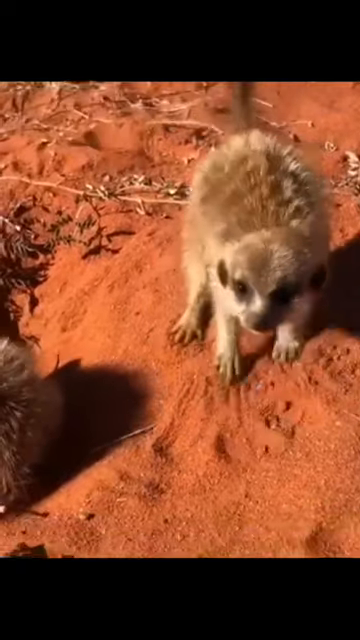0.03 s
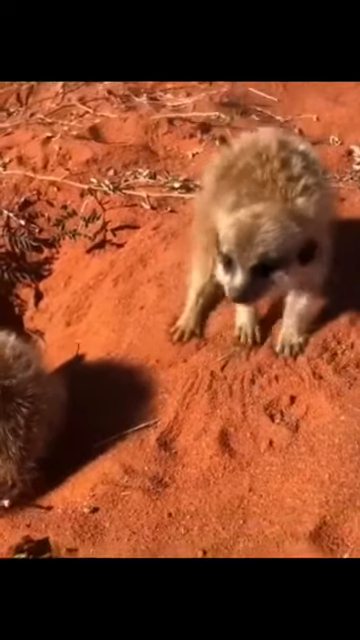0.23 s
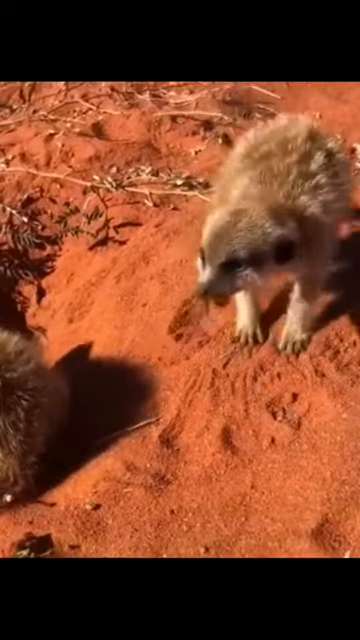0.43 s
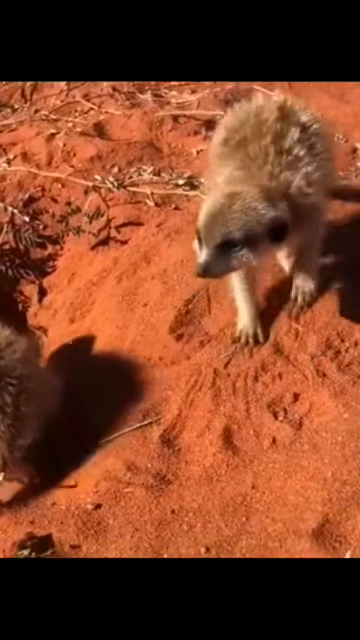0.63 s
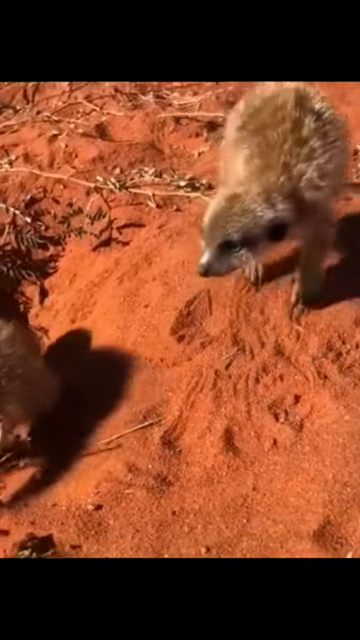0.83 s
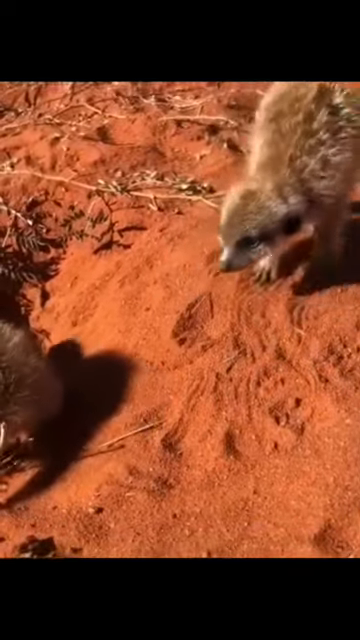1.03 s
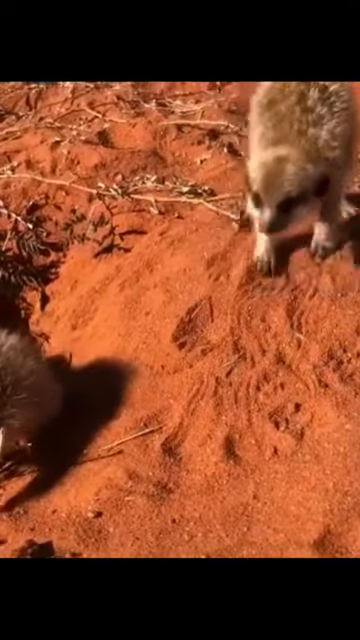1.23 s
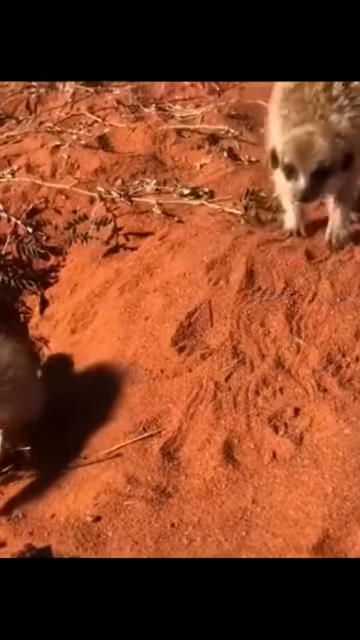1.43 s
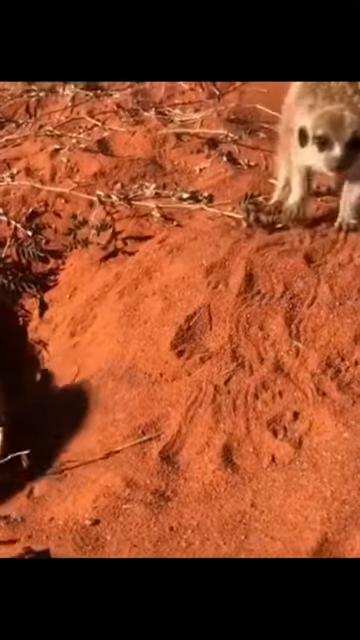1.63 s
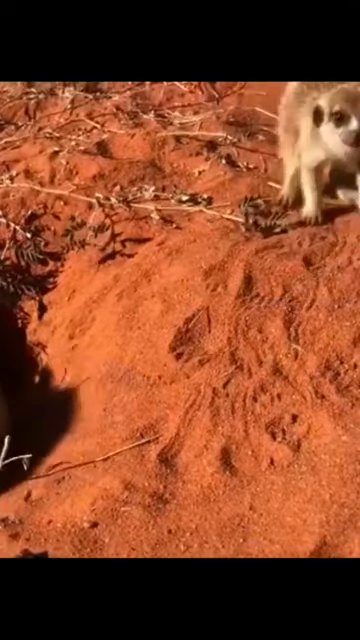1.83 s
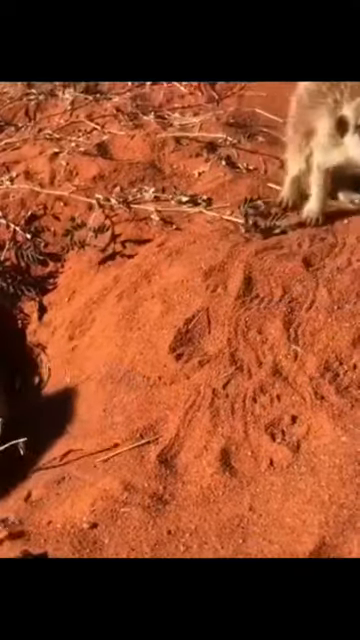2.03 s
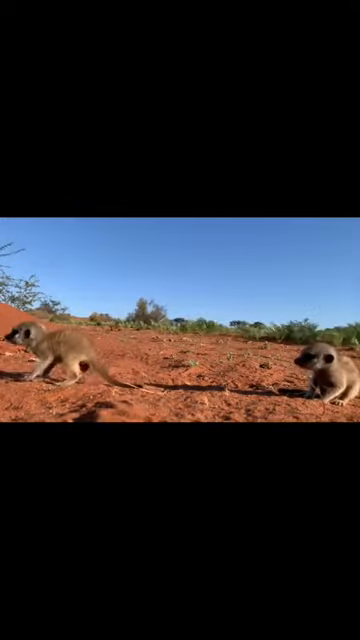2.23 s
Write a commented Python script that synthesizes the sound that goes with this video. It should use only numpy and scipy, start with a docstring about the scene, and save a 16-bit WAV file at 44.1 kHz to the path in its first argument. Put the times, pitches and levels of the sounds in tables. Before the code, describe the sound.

Meerkats trill close by in rapid little grunts: a short burst at 0.25 seconds, a louder, clear one from 0.5 to 0.7, a faint one around 1.3, and a loud one turning low and rasping from 1.8 to 2. Paws scuff sand, grit clicks and wind nudges the microphone over steady outdoor hiss. Everything cuts out near 2.2 seconds, and a dull rumble enters at about 2.3.

```python
"""Meerkats on open sand

Close up, meerkats trill in short grunts, vocal-fold pulses and breath shaped by the throat, that start
clear and high and turn low and rasping. Two faint peeps and a thin held note slip in among them.
Paws scuff the sand, grit snaps, and wind nudges the microphone over a steady outdoor hiss.
Near the end everything cuts out, and after a short silence a dull rumble comes in."""
import sys
import numpy as np
from scipy import signal
from scipy.fft import rfft, irfft
from scipy.io import wavfile
from scipy.ndimage import uniform_filter1d

SR = 44100
rng = np.random.default_rng(int(sys.argv[2]) if len(sys.argv) > 2 else 0)


def materialize(psi):
    """Save the field psi as 16-bit PCM at rate SR to the path in sys.argv[1].

    A 1-D psi becomes a single channel; in a 2-D psi each row is a channel.
    """
    bounded = np.clip(np.atleast_2d(psi).T, -1, 1)
    quanta = np.round(bounded * 32767).astype(np.int16)
    wavfile.write(sys.argv[1], SR, quanta)


N = 101429
T = np.arange(N) / SR
HZ = np.fft.rfftfreq(4096, 1 / SR)

# Tone of the outdoor hiss. Each row: frequency in Hz, relative level in dB.
HISS_EQ = [(20, -9), (55, -4.5), (300, -7.5), (700, -16), (1500, -22.5), (5000, -27), (14000, -31)]
# Gusts on the microphone. Each row: time in seconds, level in dB.
GUSTS = [(0, -40), (.22, -28.5), (.47, -43.5), (.499, -14.5), (.54, -46.5), (.62, -26), (.69, -40),
         (1.28, -42), (1.395, -25), (1.55, -23.5), (1.68, -36), (1.93, -40), (2.165, -24.5)]
# Bass-heavy tone of the gusts. Each row: frequency in Hz, relative level in dB.
GUST_EQ = [(20, -26), (55, -0.5), (100, -6), (200, -16.5), (4000, -76.5)]
# Paws on sand. Each row: centre in seconds, half length in seconds, level in dB, tilt in dB per octave.
PAW_SCUFFS = [(0.125, 0.44, -37, 1.5), (0.761, 0.018, -30, 2), (1.778, 0.21, -40, 3.5),
              (1.954, 0.05, -27.5, 0), (2.103, 0.024, -30, 2.5)]
# Tone of the sand before that tilt. Each row: frequency in Hz, relative level in dB.
SAND_EQ = [(500, -28), (2000, -3.5), (4500, -4.5), (8000, -12.5), (14000, -11)]
# Snaps of grit and twigs. Each row: start in seconds, level in dB, strongest frequency in Hz.
GRIT_SNAPS = [(.0318, -16, 11000), (.1058, -25, 12000), (.339, -23, 5000), (.3862, -24, 11000),
              (.7087, -25, 4800), (.7155, -23, 4300), (.7243, -20.5, 4300), (.807, -28, 4500),
              (.9945, -22.5, 13800), (2.095, -22, 8000)]
# Clear, steady notes that open a trill.
# Each row: start in seconds, length in seconds, level in dB, pitch in Hz.
TRILL_OPENERS = [(0.2441, 0.009, -17, 689), (0.4993, 0.013, -12, 913), (1.7646, 0.012, -14, 872)]
# The rising grunts of the trills.
# Each row: start in seconds, length in seconds, level in dB, top pitch in Hz, rasp from 0 to 1.
TRILL_GRUNTS = [ (0.262, 0.017, -17.5, 657, 0.24), (.290, 0.014, -18.5, 613, 0.16),
                (.340, 0.014, -17, 581, 0.3), (.524, 0.018, -10.5, 789, 0), (.555, 0.015, -10, 757, 0),
                (0.585, 0.013, -9, 754, 0.04), (0.615, .012, -9.5, 656, .1),
                (0.6447, .012, -10.5, 576, 0.15), (0.6775, 0.008, -14.5, 536, 0.42),
                (0.81, 0.019, -31, 658, 0.42), (1.309, 0.019, -24.5, 621, 0.26),
                (1.337, 0.015, -23, 532, 0.6), (1.367, 0.018, -24, 502, 0.55),
                (1.394, .011, -29, 566, 0.74), (1.787, 0.018, -13, 766, 0.38),
                (1.8185, 0.015, -12, 739, 0.41), (1.847, .0155, -11.5, 707, 0.52),
                (1.8788, 0.011, -10.5, 686, 0.37), (1.9102, .011, -11, 557, 0.48),
                (1.938, 0.0083, -10.5, 481, 0.7), (1.956, 0.011, -11.5, 553, 0.67),
                (1.974, 0.01, -9.5, 552, 0.78), (1.998, 0.0076, -9.5, 501, 0.7),
                (2.0232, 0.0073, -14.5, 469, 0.82)]
# Throat colour of a clear grunt. Each row: frequency in Hz, relative level in dB.
CLEAR_THROAT = [(200, -10), (480, -6), (760, 0), (1400, 3), (1900, -0.5), (3100, -12.5), (4400, -13),
                (5100, -40), (8500, -43.5), (10300, -28.5), (14000, -66.5)]
# Throat colour of a full rasp. Each row: frequency in Hz, relative level in dB.
RASP_THROAT = [(200, -22), (470, 4.5), (720, -8.5), (1000, -5.5), (1900, -21.5), (2400, -8.5), (2900, -23),
               (3800, -5), (4450, -8), (5200, -32.5), (8500, -33), (10200, -24.5), (14000, -42.5)]
# Faint peeps. Each row: start in seconds, length in seconds, level in dB, top pitch in Hz.
FAINT_PEEPS = [(0.694, 0.023, -28.5, 1500), (1.248, 0.029, -39.5, 1615)]
# The thin note under the last trill. Each row: time in seconds, pitch in Hz, level in dB.
HELD_NOTE = [(1.78, 873.6, -34), (1.84, 850, -24.5), (1.94, 805, -31), (2.06, 805, -30), (2.09, 755, -54)]
# Tone of the closing rumble. Each row: frequency in Hz, relative level in dB.
RUMBLE_EQ = [(40, 4.5), (250, 5.5), (4000, -50)]

START_HZ, RISE_S, RISE_SHARE = 455.3, .0065, .22  # grunts climb from one pitch, longer ones more slowly
FULL_DB, ATTACK_S, RELEASE_S = -6, .0022, .0009  # a grunt's level and edges at full effort
ROUGH_CLEAR, ROUGH_RASP, JITTER = .02, .27, .05  # roughness adds breath and unsteadies the pitch
BREATH_LEAD_S, LEAK_DB, LEAK_S = .002, -21.5, .0075  # air flows before the folds sound and lingers after
SWELL_DB, FOLD_LAG = 4.5, .45
BRIGHT_HZ, BRIGHT_PER_DB = 1870, 1.4  # softer grunts lose treble above this frequency
PURE_ABOVE_HZ, PURE_DB_PER_HZ = 740, .055  # so do the highest, which come out nearly pure
LOW_LAG_S, LOW_LAG_HZ = .004546, 464.8  # the lows ring late, so each grunt ends in a downward chirp
CUT_S, RUMBLE_START_S, TOP_HZ = 2.17, 2.281, 14000


def amp(db):
    """Decibels to gain."""
    return 10 ** (np.asarray(db) / 20)


def unit(x):
    """Scales to rms 1."""
    return x / np.sqrt(np.mean(x ** 2) + 1e-20)


def eq_db(points, hz=HZ):
    """Reads an EQ curve on a log-frequency axis."""
    freqs, db = np.transpose(points)
    return np.interp(np.log(hz + 1), np.log(freqs), db)


def automation(points, column=1):
    """Draws one column of a table along the timeline."""
    columns = np.transpose(points)
    return np.interp(T, columns[0], columns[column])


def add(mix, start, sound):
    """Lays a sound into the mix at a time in seconds."""
    part = mix[max(round(start * SR), 0):][:len(sound)]
    part += sound[:len(part)]


def colour(x, points):
    """Runs a signal through an EQ curve and sets it to rms 1."""
    gain = amp(eq_db(points, np.fft.rfftfreq(len(x), 1 / SR)))
    return unit(irfft(rfft(x) * gain, len(x)))


def wander(size, smoothing):
    """A smooth random drift at rms 1."""
    return unit(uniform_filter1d(uniform_filter1d(rng.standard_normal(size), smoothing), smoothing))


def outdoor_hiss(db=-34.5):
    """A steady bed of open-air noise."""
    return amp(db) * colour(rng.standard_normal(N), HISS_EQ)


def wind():
    """Gusts buffet the microphone in low lumps of noise."""
    return amp(automation(GUSTS)) * colour(rng.standard_normal(N), GUST_EQ)


def paw_scuff(centre, half_length, db, tilt, grains_per_s=2600, spread_db=3.8):
    """A paw pushes up a shower of sand: tiny random clicks that swell and fade."""
    sizes = amp(spread_db * np.minimum(rng.exponential(1, N), 4)) * rng.choice([-1, 1], N)
    grains = sizes * (rng.random(N) < grains_per_s / SR)
    tilted_eq = [(hz, level + tilt * np.log2(hz)) for hz, level in SAND_EQ]
    swell = np.exp(-.5 * ((T - centre) / half_length) ** 2)
    return amp(db) * swell * colour(grains, tilted_eq)


def grit_snap(db, hz, decay_s=.0015, skirt_db_per_octave=10, size=512):
    """Grit or a twig cracks: a very short burst, strongest around one frequency."""
    t = np.arange(size) / SR
    octaves = np.log2((np.fft.rfftfreq(size, 1 / SR) + 1) / hz)
    phases = np.exp(2j * np.pi * rng.random(len(octaves)))
    burst = irfft(amp(-skirt_db_per_octave * abs(octaves)) * phases)
    return amp(db) * unit(burst) * np.exp(-t / decay_s)


def throat(db, top_hz, rasp, size=1024):
    """The throat's ring after one pulse, blended from clear to rasping, with the lows arriving last."""
    treble_db = BRIGHT_PER_DB * (db - FULL_DB) - PURE_DB_PER_HZ * max(top_hz - PURE_ABOVE_HZ, 0)
    shelf_db = treble_db * HZ ** 6 / (HZ ** 6 + BRIGHT_HZ ** 6)
    tone_db = (1 - rasp) * eq_db(CLEAR_THROAT) + rasp * eq_db(RASP_THROAT) + shelf_db
    log_gain = np.log(amp(np.r_[tone_db, tone_db[-2:0:-1]]))
    minimum_phase = np.exp(np.conj(signal.hilbert(log_gain)))[:len(HZ)]
    lag_s = LOW_LAG_S / (1 + (HZ / LOW_LAG_HZ) ** 4)
    ring = irfft(minimum_phase * np.exp(-2j * np.pi * np.cumsum(lag_s) * HZ[1]))[:size]
    return ring / np.linalg.norm(ring)


def grunt(length, db, top_hz, rasp, from_hz, size=2048):
    """A swelling run of vocal-fold pulses, led and roughened by puffs of air, shaped by the throat."""
    t = np.arange(size) / SR - BREATH_LEAD_S
    progress = np.clip(t / length, 0, 1)
    rough = ROUGH_CLEAR + (ROUGH_RASP - ROUGH_CLEAR) * rasp ** 2
    climb = np.sin(np.pi / 2 * np.clip(t / (RISE_S + RISE_SHARE * length), 0, 1)) ** 2
    hz = (from_hz + (top_hz - from_hz) * climb) * (1 + JITTER * rough * wander(size, smoothing=40))
    cycles = np.cumsum(hz) / SR
    # higher harmonics lag a little, which spreads each pulse over its cycle
    folds = sum(np.cos(2 * np.pi * k * cycles - FOLD_LAG * k ** 2) * (k * hz < TOP_HZ)
                for k in range(1, 30))
    puffs = (.5 + np.exp(-2 * (cycles % 1))) * rng.standard_normal(size)
    softness = amp(FULL_DB - db)  # soft grunts have soft edges
    opening = np.clip(t / (ATTACK_S * softness) + .5, 0, 1)
    closing = np.clip((length - t) / (RELEASE_S * softness) + .5, 0, 1)
    voicing = opening * amp(SWELL_DB * (progress - 4)) * closing
    leak = amp(LEAK_DB) * (1 - closing) * np.exp(-abs(t - length) / LEAK_S)
    breath = rough * np.clip(t / BREATH_LEAD_S + 1, 0, 1) * closing + leak
    source = (1 - rough) * voicing * unit(folds) + breath * unit(puffs)
    voice = signal.fftconvolve(source, throat(db, top_hz, rasp))
    return amp(db) * voice * np.sqrt(length * SR / np.sum(voice ** 2))


def ground_echo(calls, db=-27, t60_s=.1, size=6000):
    """A weak, short scatter of reflections off the ground and scrub."""
    t = np.arange(size) / SR
    taps = rng.standard_normal(size) * (rng.random(size) < .1)
    taps *= (t > .002) * amp(-60 * t / t60_s)
    return amp(db) * signal.fftconvolve(calls, taps / np.linalg.norm(taps))[:N]


def peep(length, db, top_hz, crest=.44, droop=.85):
    """A nearly pure note on a small pitch arch that crests just before halfway."""
    progress = np.arange(0, length, 1 / SR) / length
    hz = top_hz * (1 - droop * (progress - crest) ** 2)
    envelope = np.sqrt(abs(np.sin(np.pi * progress)))
    return amp(db) * unit(envelope * np.sin(2 * np.pi * np.cumsum(hz) / SR))


def held_note():
    """A thin tone that sinks slowly under the last trill."""
    gate = (T > HELD_NOTE[0][0]) & (T < HELD_NOTE[-1][0])
    tone = np.sqrt(2) * np.sin(2 * np.pi * np.cumsum(automation(HELD_NOTE)) / SR)
    return gate * amp(automation(HELD_NOTE, column=2)) * tone


def rumble(db=-31.5, fade_s=.008):
    """Dull, low noise that comes in quickly after the silence."""
    fade_in = np.clip((T - RUMBLE_START_S) / fade_s, 0, 1)
    return amp(db) * fade_in * colour(rng.standard_normal(N), RUMBLE_EQ)


def scene():
    """The mono mix: calls over sand and air, a hard cut to silence, then the rumble."""
    calls = held_note()
    for start, length, db, hz in TRILL_OPENERS:
        add(calls, start - BREATH_LEAD_S, grunt(length, db, hz, rasp=0, from_hz=hz))
    for start, length, db, top_hz, rasp in TRILL_GRUNTS:
        add(calls, start - BREATH_LEAD_S, grunt(length, db, top_hz, rasp, from_hz=START_HZ))
    for start, length, db, top_hz in FAINT_PEEPS:
        add(calls, start, peep(length, db, top_hz))
    ending = rumble()
    calls += ground_echo(calls)
    sand = sum(paw_scuff(*row) for row in PAW_SCUFFS)
    for start, db, hz in GRIT_SNAPS:
        add(sand, start, grit_snap(db, hz))
    cut = np.clip((CUT_S - T) / .0008, 0, 1)
    return (cut * (calls + sand + outdoor_hiss() + wind()) + ending)[None]


def record(dry):
    """A soft clipper rounds the loud peaks, then a steep low-pass trims the very top."""
    rounded = dry / (1 + dry ** 8) ** (1 / 8)
    low_pass = signal.firwin(401, TOP_HZ, window=("kaiser", 9), fs=SR)
    return signal.oaconvolve(rounded, low_pass[None], "same")


dry = scene()
out = record(dry)
materialize(out)
```